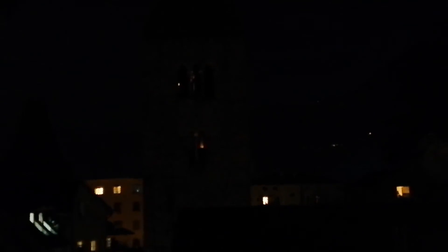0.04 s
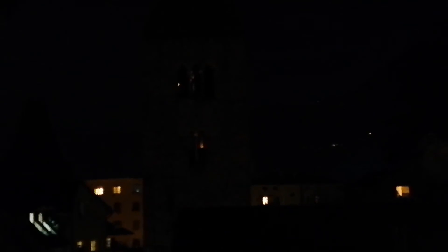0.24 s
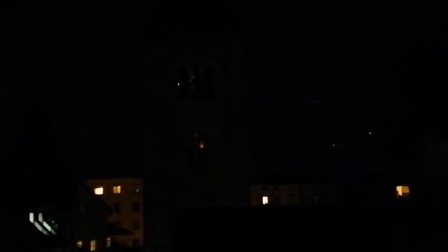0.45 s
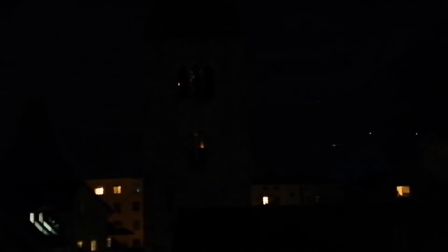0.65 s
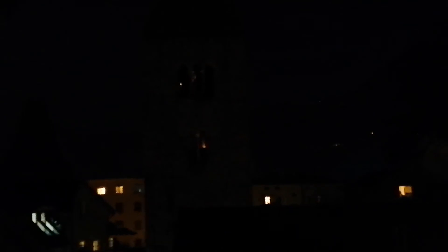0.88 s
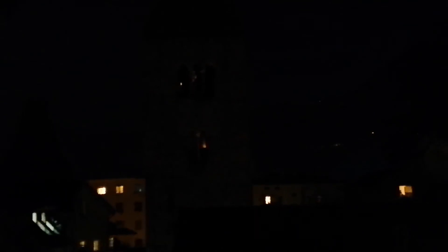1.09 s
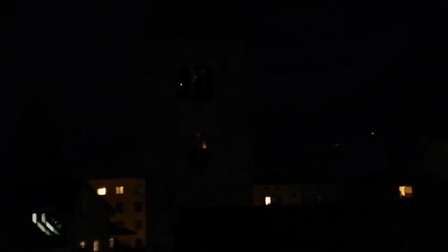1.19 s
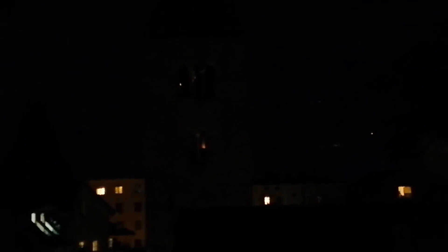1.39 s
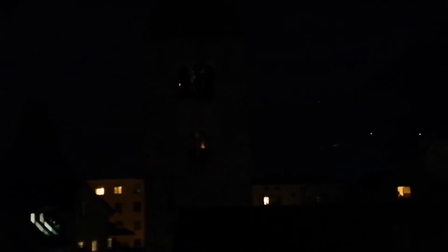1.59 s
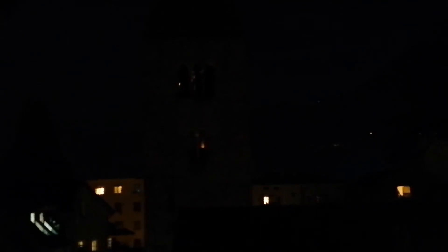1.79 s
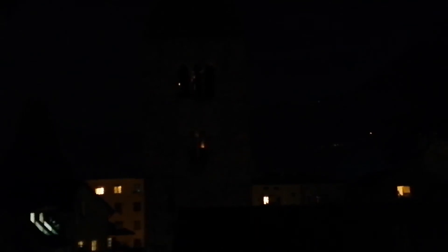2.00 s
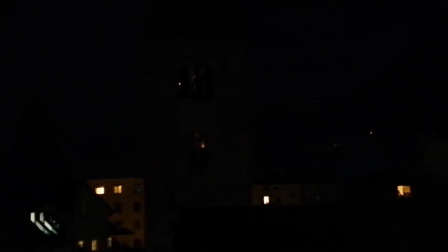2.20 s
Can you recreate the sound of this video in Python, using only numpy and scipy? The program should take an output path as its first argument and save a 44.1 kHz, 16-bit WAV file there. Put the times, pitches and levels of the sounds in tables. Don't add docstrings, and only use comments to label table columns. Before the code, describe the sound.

A large swinging church bell, still ringing from earlier strokes, is struck twice about a second apart; metallic overtones warble and echo off buildings, heard outdoors at a distance in stereo over faint traffic rumble and hiss.

```python
import sys
import numpy as np
from scipy import signal
from scipy.fft import rfft, irfft, next_fast_len
from scipy.io import wavfile
from scipy.ndimage import uniform_filter1d

SR = 44100
rng = np.random.default_rng(int(sys.argv[2]) if len(sys.argv) > 2 else 0)


def inscribe(sig):
    pcm = np.round(np.clip(np.atleast_2d(sig).T, -1, 1) * 32767)
    wavfile.write(sys.argv[1], SR, pcm.astype(np.int16))


def rack_gain(trim_db):
    fader = np.asarray(trim_db, float)
    return 10 ** (fader / 20)


N = 99225
LEAD_S = 1
FINER = 4
SWING_S = 2.11
RISE_S = 0.0011


def evened(x):
    return x / np.sqrt(np.mean(x ** 2) + 1e-20)


def read(points, hz):
    point_hz, value = np.transpose(points)
    return np.interp(np.log(hz + 1), np.log(point_hz + 1), value)


def bell(t):
    blow_starts = [
        -1.9,
        -.85,
        .2036,
        1.2588,
    ]
    # level_db, brightness_db_per_octave, clang_db
    blow_strengths = [
        (4.5, 1.5, 0),
        (-2.5, 3, 5),
        (0.5, -1.5, -2.5),
        (-2, 0, 1.5),
    ]
    # pitch_hz, level_db, t60_s, pair_split_hz, facing_extra_db
    rim_partials = [(467.24, -54.5, 10, 1.4, -3), (966.4, -44.5, 4, 2.19, -0.5),
                    (1168.3, -40.5, 3.6, 1.1, -4.5), (1517.6, -47, 1.6, 1.3, -0.5),
                    (2020, -36.5, 1.98, 2.127, -3.5), (3036.4, -43, 1.48, 2, -4),
                    (4169, -47, 1.01, 1.96, -4.5), (5406, -51, 1.04, 2.2, -3.5),
                    (6650, -60.5, 0.61, 2.4, -4), (7990, -76, 1.3, 4.6, 1), (9330, -72.5, 0.69, 2.3, -1),
                    (10800, -79.5, .5, 4, -2.5), (11750, -92.5, .4, 4, 0)]
    # pitch_hz, level_db, t60_s, pair_split_hz, facing_extra_db
    waist_partials = [(1223, -56.5, 0.48, 5, 9), (1831, -53.5, 0.51, 8.9, -2), (1935, -47.5, 0.25, 3.9, -2),
                      (2460, -43, 0.79, 2.3, -1), (2581, -53.5, 0.87, 4.5, 5.5),
                      (2655, -52, 1.51, 8.8, -5.5), (2786, -61.5, 0.7, 1.6, -0.5), (3342, -67, 1.3, 4.3, 0),
                      (3890, -59, 0.78, 4.1, -7), (4670, -68, 0.81, 3.6, -8.5), (4985, -59, 0.57, 2.4, -5),
                      (6180, -66, 0.41, 4.3, -1), (8400, -84.5, 0.19, 3, 4), (9800, -82, 0.29, 3, -13)]
    step_samples = 16
    clang_level_db, pair_db = -39, -5
    damped_db, damped_hz = -6.5, 1500
    bloom_s, bloom_hz = 0.0084, 2950
    aimed_s, aimed_db = 1.07, 5

    out = np.zeros(len(t))
    for start_s, (_, _, clang_db) in zip(blow_starts[1:], blow_strengths[1:]):
        part = out[round((start_s + LEAD_S) * SR):][:SR // 4]
        part += rack_gain(clang_level_db + clang_db) * clank()[:len(part)]

    coarse = t[::step_samples]
    aimed = np.cos(2 * np.pi * (coarse - aimed_s) / SWING_S)
    partials = rim_partials + waist_partials
    phases = rng.uniform(0, 2 * np.pi, (len(partials), len(blow_strengths)))
    for (hz, level_db, t60_s, split_hz, face_db), row in zip(partials, phases):
        ring = np.zeros(len(coarse), complex)
        rise_s = RISE_S + bloom_s / (1 + (bloom_hz / hz) ** 4)
        for start_s, (blow_db, tilt_db, _), phase in zip(blow_starts, blow_strengths, row):
            since_s = np.maximum(coarse - start_s, 0)
            rise = 1 - np.exp(-since_s / rise_s)
            decay_db = blow_db + tilt_db * np.log2(hz / 2000) - 60 * since_s / t60_s
            fresh = rack_gain(decay_db) * np.exp(1j * phase)
            pair = 1 + rack_gain(pair_db) * np.exp(2j * np.pi * split_hz * since_s)
            kept = rack_gain(damped_db * hz / (hz + damped_hz) * rise)
            ring = ring * kept + rise * fresh * pair
        ring *= rack_gain(level_db + (aimed_db + face_db) * aimed)
        out += (np.interp(t, coarse, ring) * np.exp(2j * np.pi * hz * t)).real
    return out


def clank():
    # pitch_hz, density_db_per_hz
    clang_spectrum = [(300, -29), (800, -14.5), (1200, -10), (1950, -5), (2500, -7), (4200, -22.5),
                      (8000, -30.5), (11500, -60)]
    modes_count, t60_s = 180, 0.17
    since_s = np.arange(SR // 4) / SR
    place, size, phase, life = rng.random((modes_count, 4)).T
    hz = np.geomspace(400, 11500, modes_count) * (1 + 0.033 * (place - .5))
    spacing_db = 10 * np.log10(hz / 2000)
    gain = rack_gain(read(clang_spectrum, hz) + spacing_db + 11 * (size - .5))
    pole = 2j * np.pi * hz - np.log(1000) / (t60_s * (.6 + .8 * life))
    ringing = np.exp(np.outer(pole, since_s).astype(np.complex64))
    modes = (gain * np.exp(2j * np.pi * phase)) @ ringing
    return modes.real / np.sqrt(np.sum(gain ** 2) / 2) * (1 - np.exp(-since_s / RISE_S))


def away(t):
    nearest_s, linger = .62, 0.063
    turn = 2 * np.pi * (t - nearest_s) / SWING_S
    return linger * np.cos(3 * turn) - np.cos(turn)


def leaving(fine, t, share, delay_s):
    swing_m, sound_m_per_s = 1.0387, 343
    late_s = delay_s + share * swing_m * away(t - delay_s) / sound_m_per_s
    return np.interp((t - late_s + LEAD_S) * SR * FINER, np.arange(len(fine)), fine)


def direct(fine, t):
    share, level_db, pan_db, lag_ms = .3, 0.39, 0.66, 0.008
    ears = []
    for side in (.5, -.5):
        path = leaving(fine, t[-N:], share, side * lag_ms / 1000)
        ears.append(rack_gain(level_db + side * pan_db) * path)
    return np.array(ears)


def wall(delay_s):
    smear, dull_hz_s = .06, 900
    taps = np.zeros((2, SR // 10))
    at = (rng.random((2, 5)) * (smear * delay_s + .0004) * SR).astype(int)
    signs = rng.choice([-1., 1.], (2, 5))
    np.put_along_axis(taps, np.clip(at, 0, SR // 20), signs / np.sqrt(5), 1)
    r = np.exp(-2 * np.pi * dull_hz_s / delay_s / SR)
    return signal.lfilter([1 - r], [1, -r], taps)


def wall_echoes(fine, t):
    # swing_share, delay_s, level_db, left_right_db
    wall_paths = [
        (0.22, .004, -3, -9),
        (0.899, .012, -5.5, 1),
        (-0.788, .009, -4.5, 2.5),
        (0.228, .04, -6, -6),
        (-0.132, .075, -2.5, -1.5),
        (-0.387, .185, -6.5, 4.5),
        (0.586, .3, -10.5, -2),
        (-.8, 0.58, -12.5, 2),
    ]
    heard = np.zeros((2, N))
    margin = SR // 10
    for share, delay_s, level_db, pan_db in wall_paths:
        path = leaving(fine, t[-N - margin:], share, delay_s)
        echo = signal.oaconvolve(path[None], wall(delay_s), axes=1)
        heard += rack_gain(level_db + np.array([[.5], [-.5]]) * pan_db) * echo[:, margin:margin + N]
    return heard


def town():
    # pitch_hz, t60_s
    town_decay = [(400, 2.26), (1500, 2.61), (4000, 1.2), (10000, 0.91)]
    taps = np.zeros((2, SR))
    at = np.arange(400, SR - 40, 40) + rng.integers(0, 40, (2, (SR - 401) // 40))
    np.put_along_axis(taps, at, rng.choice([-1., 1.], at.shape), 1)
    hz, time_s, z = signal.stft(taps, SR, nperseg=256)
    fade = rack_gain(-60 * time_s / read(town_decay, hz)[:, None])
    tail = signal.istft(z * fade, SR, nperseg=256)[1]
    return tail / np.linalg.norm(tail[0])


def town_echoes(fine, t):
    level_db, shares = -3.5, (-0.889, -0.353, 0.269, 0.816)
    heard = np.zeros((2, N))
    for share in shares:
        wet = signal.fftconvolve(leaving(fine, t, share, 0)[None], town(), axes=1)
        heard += rack_gain(level_db) / np.sqrt(len(shares)) * wet[:, len(t) - N:len(t)]
    return heard


def ports(heard):
    # pitch_hz, left_right_db
    port_shading = [(250, -10.5), (467, 14), (970, 4), (1200, 3.5), (2000, 4.5), (3500, -9), (6000, 3),
                    (10000, 1)]
    size = next_fast_len(N + 4096)
    difference_db = read(port_shading, np.fft.rfftfreq(size, 1 / SR))
    shade = rack_gain(np.outer([.5, -.5], difference_db))
    return irfft(rfft(heard, size) * shade, size)[:, :N]


def night():
    # pitch_hz, density_db_per_hz
    night_spectrum = [(20, 0.5), (200, -0.5), (270, -8), (390, -3.5), (900, -15.5), (2200, -27),
                      (6000, -39.5), (14900, -57)]
    # pitch_hz, likeness
    ear_likeness = [(30, .85), (300, 0.75), (1000, 0.53), (4000, .3), (12000, .1)]
    level_db, patchy_db = -55, 2
    frame_count, hz = N // 512 + 5, np.fft.rfftfreq(2048, 1 / SR)
    a, b, c, d, patches = rng.standard_normal((frame_count, 1025, 5)).T
    patches = evened(uniform_filter1d(uniform_filter1d(patches, 10, 0), 8, 1))
    same = np.clip(read(ear_likeness, hz), -1, 1)[:, None]
    left = a + 1j * b
    right = same * left + np.sqrt(1 - same ** 2) * (c + 1j * d)
    z = np.array([left, right])
    z *= rack_gain(read(night_spectrum, hz)[:, None] + patchy_db * patches)
    return rack_gain(level_db) * evened(signal.istft(z, nperseg=2048, noverlap=1536)[1][:, :N])


def engine():
    # time_s, level_db
    engine_level = [(0.0, -74.5), (0.31, -72), (0.36, -74), (1.05, -56), (1.17, -76), (1.21, -69),
                    (1.47, -81), (1.5, -71), (1.81, -64), (1.87, -56), (2.14, -57), (2.25, -64)]
    pitch_hz, width_hz = 59, 3.8
    hz = np.fft.rfftfreq(N, 1 / SR)
    resonance = 1 / (1 + ((hz - pitch_hz) / width_hz) ** 2) ** 2
    drone = evened(irfft(rfft(rng.standard_normal(N)) * resonance, N))
    time_s, level_db = np.transpose(engine_level)
    return drone * rack_gain(np.interp(np.arange(N) / SR, time_s, level_db))


def scene():
    t = np.arange(-LEAD_S * SR, N) / SR
    fine = signal.resample_poly(bell(t), FINER, 1)
    heard = direct(fine, t) + wall_echoes(fine, t) + town_echoes(fine, t)
    return ports(heard) + night() + engine()


def roll_off(x):
    return signal.sosfilt(signal.butter(12, 15040, fs=SR, output="sos"), x)


def record(dry):
    return roll_off(dry)


dry = scene()
out = record(dry)
inscribe(out)
```